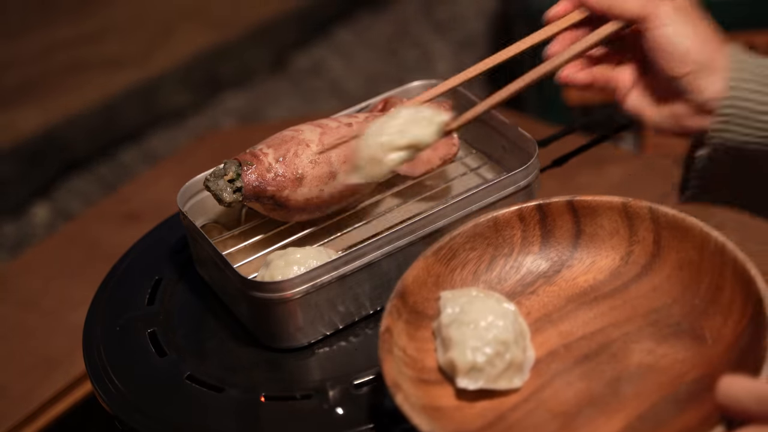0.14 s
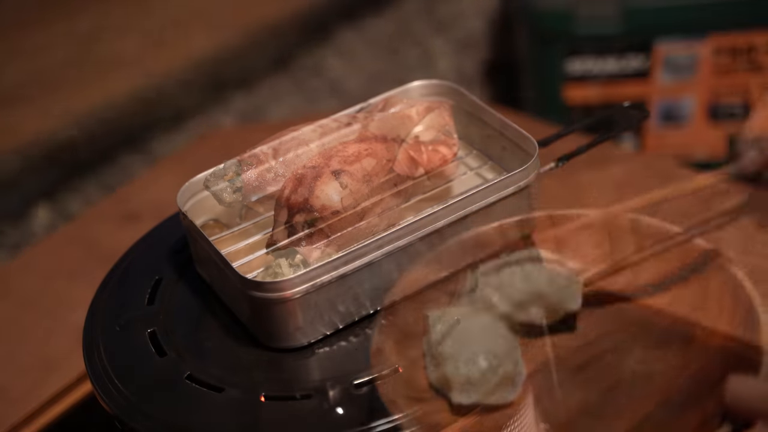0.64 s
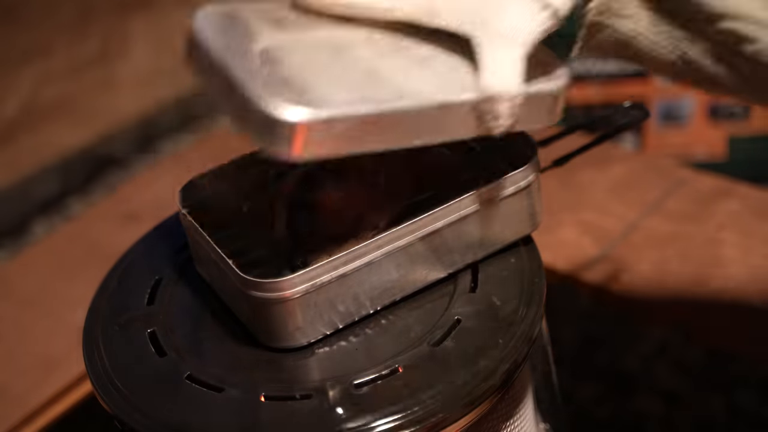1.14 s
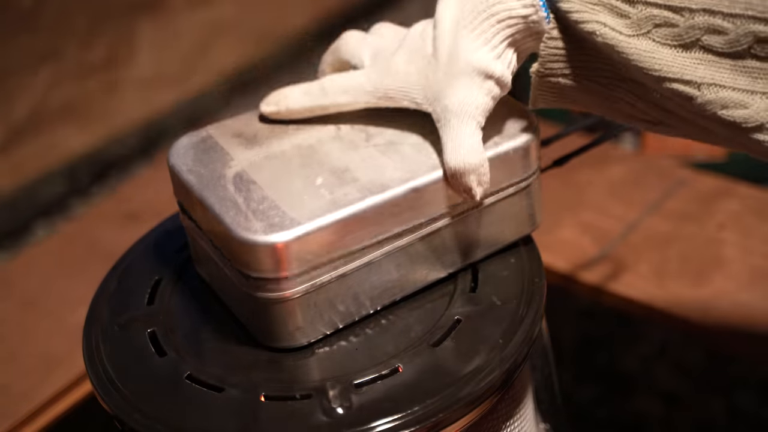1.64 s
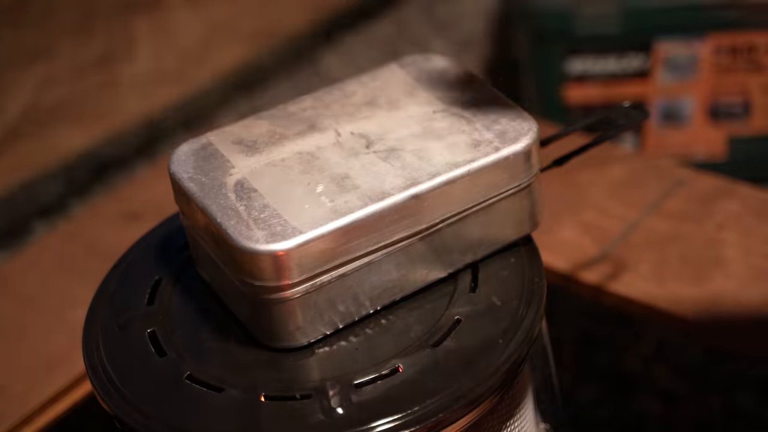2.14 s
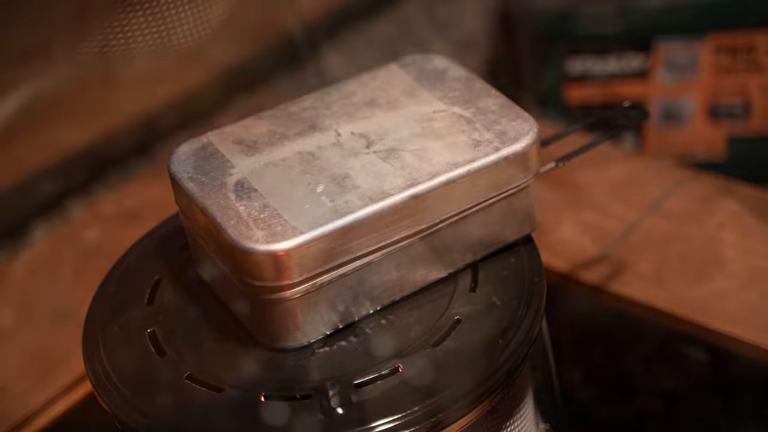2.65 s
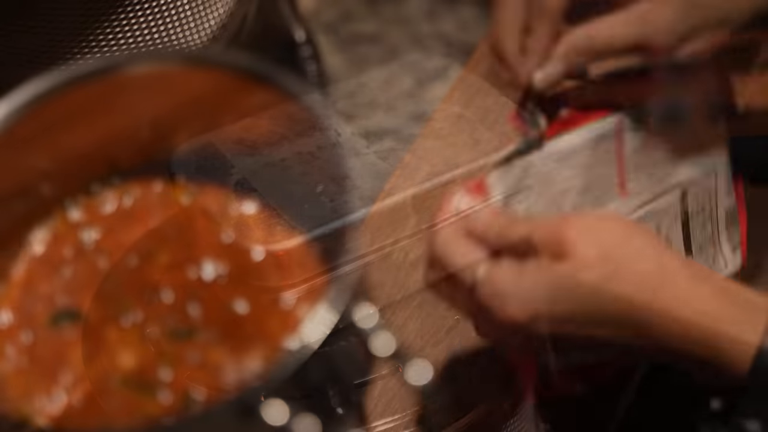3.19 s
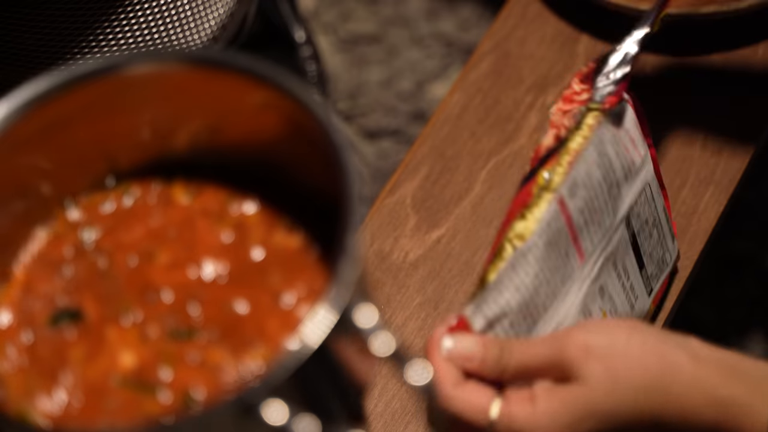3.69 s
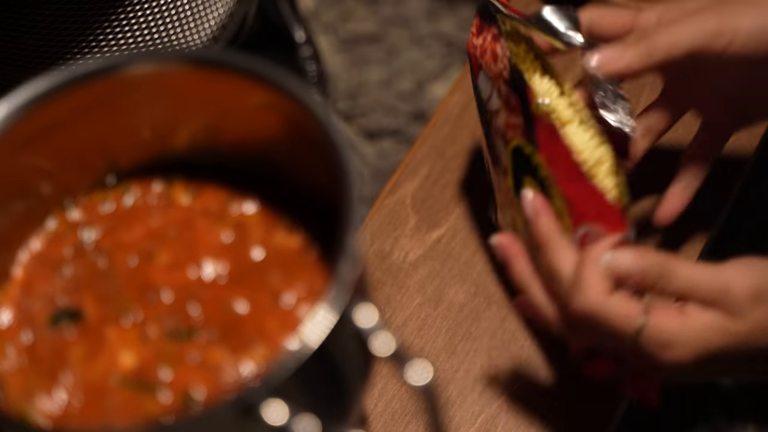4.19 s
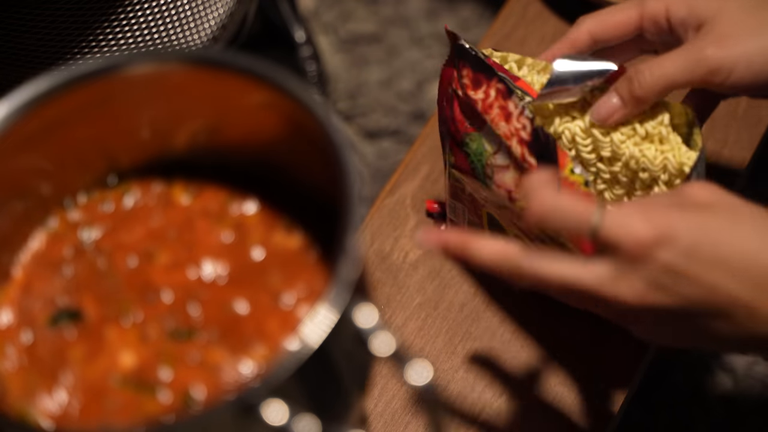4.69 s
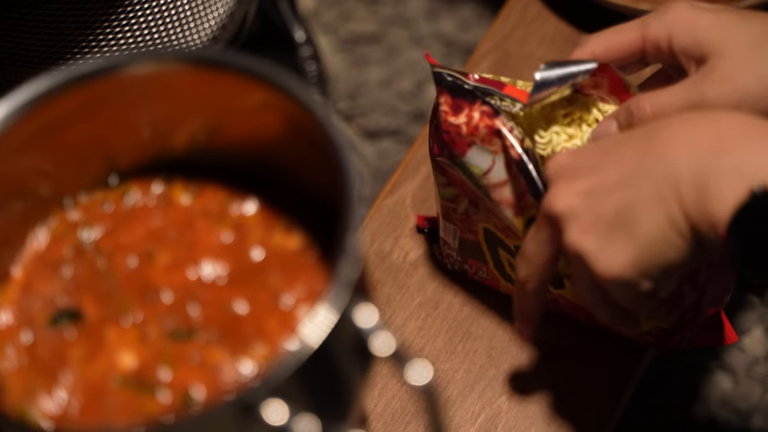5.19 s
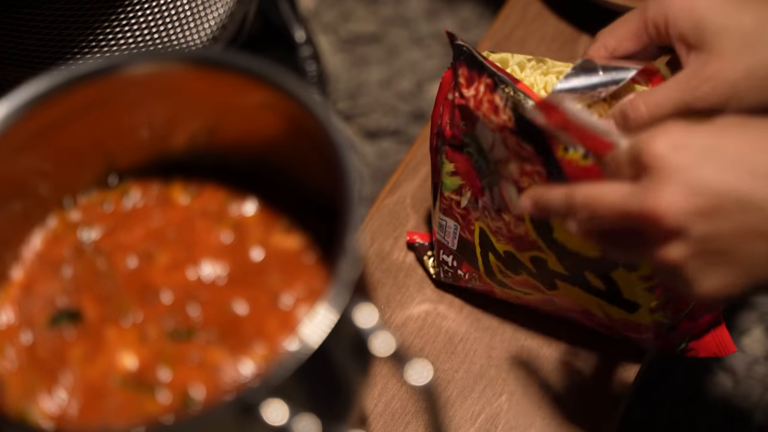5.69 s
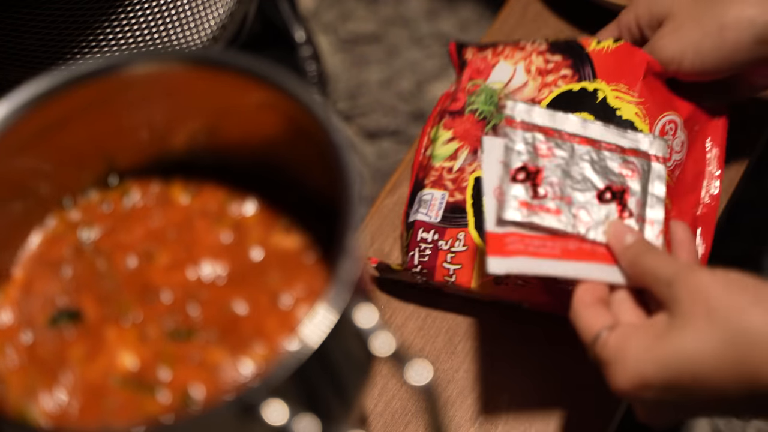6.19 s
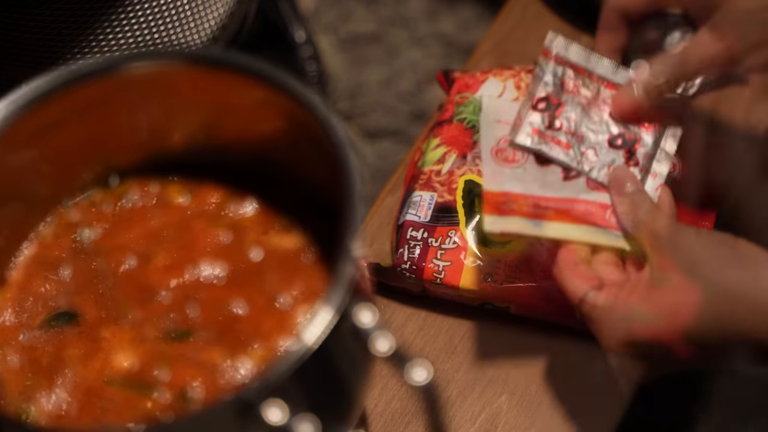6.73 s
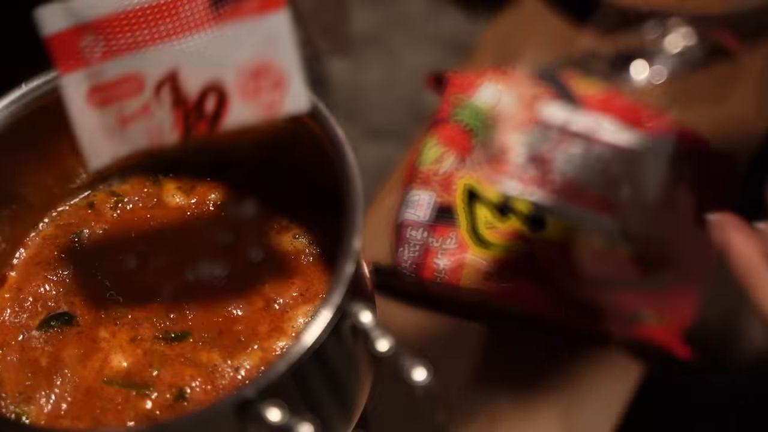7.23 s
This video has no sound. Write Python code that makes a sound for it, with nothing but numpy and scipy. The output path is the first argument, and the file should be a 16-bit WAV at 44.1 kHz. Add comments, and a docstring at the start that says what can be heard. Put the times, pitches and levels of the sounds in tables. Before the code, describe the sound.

A quiet camp kitchen at night, under a small shelter, picked up by one close microphone. Stove hiss, soft scraping and low rumble run beneath faint insect shimmer, high and steady; the hiss recedes once the packet takes over. At 0-0.5 s chopsticks give light clicks and dull knocks, with one more tick near 1.1 s. From 1.6 to 1.8 s a thin metal lid settles in several small clinks, ringing briefly with scraping rims. Tentative plastic crinkles begin around 2.1 s and thicken after 2.5. From 3 to 3.9 s the stiff film tears, in dense bright crackle with the loudest sharp snaps. Handling continues in bursts from 4 to 5 s, a hard crack lands at 5.3, and rustling follows. From 6 to 7.4 s there are sparser crisp crinkles, ticks and soft wooden bumps. Echoes are short and close.

```python
"""A camp kitchen at night under a small shelter. Throughout, a stove hisses, scrapes and rumbles (filtered noise) and
insects shimmer near 4 and 8 kHz (narrow noise). First chopsticks tap: snaps and dull knocks; at 1.6 s a tin lid is
set down, ringing in damped modes. From about 2.1 s a stiff plastic packet is torn and handled: its creases buckle in
dense tiny clicks and lone loud snaps, echoed by close walls. One microphone, both channels alike."""
import sys
import numpy as np
from scipy import signal
from scipy.fft import rfft, irfft, next_fast_len
from scipy.io import wavfile
from scipy.ndimage import uniform_filter1d

SR = 44100
rng = np.random.default_rng(int(sys.argv[2]) if len(sys.argv) > 2 else 0)


def attenuation_scalar(level_db):
    """Turn a level in dB into a linear amplitude multiplier (20 dB per decade)."""
    decades = np.asarray(level_db, float) / 20
    return 10 ** decades


def put_to_file(sound):
    """Save the sound as 16-bit audio at rate SR, in the file named by the first command-line argument."""
    columns = np.atleast_2d(sound).T  # one column per channel
    safe = np.clip(columns, -1, 1)
    whole_steps = np.round(safe * 32767)
    wavfile.write(sys.argv[1], SR, whole_steps.astype(np.int16))


N = 324135
T = np.arange(N) / SR
TAIL_SAMPLES = 8000


def level(x, db):
    """Scale to an rms level."""
    return x * attenuation_scalar(db) / np.sqrt(np.mean(x ** 2))


def curves(table):
    """Columns of a table at every sample."""
    s, *columns = np.transpose(table)
    return [np.interp(T, s, c) for c in columns]


def band(x, edges_hz, order=2):
    """Band-pass."""
    sos = signal.butter(order, np.clip(edges_hz, 20, 0.45 * SR), "band", fs=SR, output="sos")
    return signal.sosfilt(sos, x)


def colour(x, points):
    """Gain by frequency, joined on a log axis."""
    hz, gain_db = np.transpose(points)
    size = next_fast_len(N)
    bins_hz = np.arange(size // 2 + 1) * SR / size
    gain = attenuation_scalar(np.interp(np.log(bins_hz + 1), np.log(hz), gain_db))
    return irfft(rfft(x, size) * gain, size)[:N]


def walk(rate_hz):
    """Random levels held 1 / rate_hz and slewed twice; spread near 1."""
    k = int(SR / rate_hz)
    held = np.repeat(rng.standard_normal(N // k + 1), k)
    return 1.48 * uniform_filter1d(uniform_filter1d(held, k), k)[:N]


def shelter(x, t60_s, wet_db, gap_ms=2.05, rise_ms=0.96):
    """Close cloth walls: a short gap, separate echoes, then a wash that dies fast.
    The hands move about, so every 15 ms the sound takes an echo path drawn at random."""
    paths, path_samples = 48, 662
    t = T[:TAIL_SAMPLES]
    late_s = np.maximum(t - gap_ms / 1000, 0)
    sparse = attenuation_scalar(6.5 * np.exp(-t / 0.017) * rng.exponential(size=(paths, len(t))))
    envelope = (1 - np.exp(-late_s * 1000 / rise_ms)) * attenuation_scalar(-60 * late_s / t60_s)
    echo = sparse * rng.standard_normal((paths, len(t))) * envelope
    echo = echo * attenuation_scalar(wet_db) / np.sqrt(np.sum(echo ** 2, axis=1, keepdims=True))
    pieces = np.append(x, np.zeros(-N % path_samples)).reshape(-1, path_samples)
    size = next_fast_len(path_samples + len(t))
    chosen = rfft(echo, size)[rng.integers(0, paths, len(pieces))]
    wet = irfft(rfft(pieces, size) * chosen, size)
    out = np.append(x, np.zeros(2 * size))
    for k, piece in enumerate(wet):
        out[k * path_samples:k * path_samples + size] += piece
    return out[:N]


# stove and close handling, before flutter and fade: time_s, hiss_db, scrape_db
STOVE_LEVELS = [(0.0, -35.5, -49), (0.2, -43, -44), (0.37, -43, -42.5), (0.53, -46.5, -54),
                (0.81, -45, -53.5), (1.2, -44.5, -58.5), (1.5, -46.5, -61), (1.79, -41, -46),
                (1.93, -49.5, -60), (2.18, -47, -60), (2.25, -42, -53)]


def stove():
    """Fine noise hiss above, soft scraping below; both give way to the packet."""
    hiss_db, scrape_db = curves(STOVE_LEVELS)
    hiss = level(band(rng.standard_normal(N), (3000, 17000), order=1), 0)
    hiss = hiss * attenuation_scalar(hiss_db + 2.0 * walk(10.93))
    scrape = level(band(rng.standard_normal(N), (600, 3200)), 0)
    scrape = scrape * attenuation_scalar(scrape_db + 2.5 * walk(24.9))
    return (hiss + scrape) * np.clip((2.6 - T) / 0.35, 0.3, 1)


# low noise before flutter: time_s, rumble_db, rush_db
RUMBLE_LEVELS = [(0, -49, -44), (.16, -40.5, -43), (.3, -49, -43.5), (.47, -40.5, -42), (.7, -49, -47.5),
                 (1.29, -48, -48), (1.45, -51, -49), (2.4, -49, -49), (2.8, -49, -48), (3.05, -53, -51.5),
                 (3.3, -52, -41.5), (4, -52.5, -48.5), (5.1, -51, -48.5), (6.3, -52, -47.5),
                 (6.45, -46, -48.5), (6.7, -49, -44.5), (7.05, -50.5, -48), (7.35, -44, -46)]


def rumble():
    """Burner roar and far-off traffic: two fluttering bands of low noise."""
    low_db, rush_db = curves(RUMBLE_LEVELS)
    low = level(band(rng.standard_normal(N), (58, 200), order=3), 0) * attenuation_scalar(low_db + 0.98 * walk(7))
    rush = level(band(rng.standard_normal(N), (200, 800)), 0) * attenuation_scalar(rush_db + 2.07 * walk(14))
    return low + rush


# chorus bands, before shimmer: centre_hz, width_hz, level_db
INSECT_BANDS = [(3850, 470, -50.5), (4370, 330, -55), (7800, 620, -60)]


def insects():
    """A distant chorus blurs into narrow noise bands that shimmer."""
    out = np.zeros(N)
    for hz, width_hz, db in INSECT_BANDS:
        chorus = band(rng.standard_normal(N), (hz - width_hz / 2, hz + width_hz / 2))
        out += level(chorus, db) * attenuation_scalar(1.5 * walk(9.7))
    return out


def clicks(spread_db=4.5, most_db=19.5, scatter_db=3.0, bunch_db=0.5):
    """Random buckling: many faint clicks, few strong ones, in bunches; each fold size takes its own share."""
    clicks_per_s = 2500
    size_db = np.minimum(spread_db * rng.exponential(size=N), most_db) + bunch_db * walk(45)
    struck = rng.random(N) < clicks_per_s / SR
    train = struck * rng.choice([-1., 1.], N) * attenuation_scalar(size_db)
    return level(train * attenuation_scalar(scatter_db * rng.standard_normal(size=(3, N))), 0)


# lone snaps of film, chopstick and fingernail, before crack gain, flurry, colour and echo:
# crack_s, crack_db, swarm_db, large_fold_db, fine_crease_db (last two re middle folds)
SNAP_EVENTS = [(0.032, -18, -27, -0.5, -1), (0.1556, -25, -37, -1, -7), (0.1938, -22, -45, 0, 2),
               (0.4965, -18, -42.5, -3, 0.5), (1.0658, -17.5, -46, -14, 9), (2.1369, -34, -47, -3, 0),
               (2.2202, -21, -53, -14, -5), (2.2445, -24, -36, -16, 1), (2.2958, -26, -36.5, -8, 0),
               (2.3415, -21, -36.5, -16, 2.5), (2.4418, -19, -31.5, -7, 0), (2.5026, -11.5, -51, -14, 5),
               (2.575, -11.5, -48, -7, 0), (2.6845, -14, -41, -4, -2), (2.7384, -17, -32.5, -11, 0.5),
               (2.81, -12.5, -31.5, -9.5, 2), (2.852, -22, -33.5, -4.5, -1), (2.9676, -22, -39.5, -21, 5),
               (3.0022, -11.5, -32.5, -3.5, -3), (3.0385, -19, -36, -19, 2), (3.0533, -7, -31, -5.5, 0),
               (3.1057, -9, -31, -12, -2), (3.145, -12, -40, -3, -2), (3.1916, -7, -27, -12, 3),
               (3.2493, -1, -28.5, -16, 4), (3.3414, -15, -32, -6, 0), (3.379, -2.5, -29, -8.5, -3),
               (3.4321, -4, -25, -6.5, -0.5), (3.483, -4.5, -24, -10, 0), (3.5092, 1.5, -28, -6, -7),
               (3.6297, -13, -31.5, -3.5, 3), (3.6514, -6, -31, -10, 5), (3.6862, -14, -24, -7, 0.5),
               (3.7722, -7.5, -33, -11, -1), (3.7993, -0.5, -26, -9.5, 1.5), (3.8325, -10, -26.5, -10, 1),
               (3.862, -4, -27.5, -9.5, -1), (3.8726, -4, -26.5, -19, 4), (4.0205, -10, -37.5, -14, 4),
               (4.045, -18, -35.5, -22, 9), (4.0906, -6, -45, -17, 11), (4.107, -12, -40, -27, 13),
               (4.156, -8, -28, -9, 1.5), (4.224, -9.5, -50, -4.5, -6), (4.2666, -10.5, -36, -12, 2),
               (4.3363, -14, -40, -15, 4), (4.389, -11, -30.5, -22, 1), (4.4346, -9, -26.5, -8.5, 3.5),
               (4.6673, -15, -32, -9, 2), (4.7233, -2.5, -24, -8.5, -0.5), (4.829, -15, -36, -12, 2),
               (4.9172, -5, -32.5, -2, 5), (4.9619, -9, -31.5, -5.5, 2), (4.995, -9.5, -32.5, -4, 1),
               (5.0651, -17, -30, -4, -2), (5.2054, -18, -45.5, 5, -11), (5.3196, -34, -32, -1.5, -4),
               (5.3296, 1.5, -32, -19, 2.5), (5.4434, -12.5, -30, -3, -2.5), (5.4834, -11.5, -37.5, 4, -6),
               (5.5162, -20, -32, -6.5, -6), (5.6437, -13, -47, -24, 13), (5.6866, -20, -44, 1, 1),
               (5.8399, -11, -40, -9.5, 0.5), (5.9006, -21, -43, -18, 8.5), (5.962, -23, -38.5, -18, 5.5),
               (6.0769, -13.5, -47, -4, 2), (6.1244, -7, -51, -15, 12), (6.1299, -3, -41, -21, 12),
               (6.217, -6.5, -29, -5.5, 5), (6.3318, -7, -34.5, -12, -3.5), (6.3569, -8, -36, -7, 1),
               (6.4385, -24, -31.5, -3, -3), (6.5038, -12.5, -38, -0.5, 1), (6.53, -16, -40.5, -24, 10),
               (6.5735, -8, -37, -6, 4.5), (6.7354, -24, -53, -8, -8), (6.8067, -16, -37, -13.5, 1),
               (6.8746, -13, -54, -14, 8), (6.9012, -21, -40, 0.5, 5), (6.972, -17, -52, 1, 2.5),
               (6.998, -16, -36.5, 3.5, -2), (7.0504, -16, -44, 1, -6), (7.0798, -21, -40.5, 1, -2),
               (7.209, -16, -40, -8, 2), (7.2953, -19, -37, 0, 0), (7.3085, -12, -32, -16, 6)]


def snaps(crack_gain_db=3.5):
    """A crease lets go in one sharp crack and sets off a dying swarm of its neighbours."""
    crack_samples = 24
    swarm_t60_s, swarm_lead_s = 0.18, 0.0015  # the neighbours start to give just before the crack
    flurry_db, flurry_s = 4, 0.0028  # the first neighbours go all at once
    rattle = rng.standard_normal((len(SNAP_EVENTS), crack_samples)) * np.exp(-np.arange(crack_samples) / 3)
    rattle[:, 0] = 3
    rattle = rattle / np.sqrt(np.sum(rattle ** 2, axis=1, keepdims=True))
    t = T[:TAIL_SAMPLES]
    dying_db = flurry_db * np.exp(-t / flurry_s) - 60 * t / swarm_t60_s
    cracks, swarm_power = np.zeros((2, 3, N + SR))
    for (s, db, swarm_db, fold_db, crease_db), shape in zip(SNAP_EVENTS, rattle):
        i = int(s * SR)
        share = attenuation_scalar(np.array([fold_db, 0, crease_db]))[:, None]
        cracks[:, i:i + crack_samples] += attenuation_scalar(db + crack_gain_db) * share / share.max() * shape
        j = i - int(swarm_lead_s * SR)
        swarm_power[:, j:j + TAIL_SAMPLES] += (share * attenuation_scalar(swarm_db + dying_db)) ** 2
    return cracks[:, :N] + np.sqrt(swarm_power[:, :N]) * clicks(most_db=17.0, bunch_db=1.17)


def radiate(train, edges_hz):
    """Clicks keep their power but sound only in one band."""
    return band(train, edges_hz) * np.sqrt(SR / 2 / (edges_hz[1] - edges_hz[0]))


# tone of the film: freq_hz, gain_db
FILM_TONE = [(200, 0.5), (500, -6.5), (1000, -1), (2000, 1.5), (3000, 0.13), (5000, 1.24), (8000, 2.2),
             (12000, 1.3), (15500, -0.6)]


def film(sizes):
    """Three sizes of fold radiate their own band, each with its own echo among the walls."""
    fold = shelter(radiate(sizes[0], (318, 2260)), 0.13, 1.37)
    body = shelter(radiate(sizes[1], (2220, 7560)), 0.32, 1.0)
    crease = shelter(radiate(sizes[2], (6840, 16570)), 0.36, 1.17)
    return colour(fold + body + crease, FILM_TONE)


# dull bumps on the board, before band-pass and echo: start_s, level_db, pitch_hz
BOARD_KNOCKS = [(0.032, -21, 1300), (.155, -33, 1500), (0.465, -26.5, 284), (3.005, -34, 293),
                (3.1, -27, 571), (3.192, -23.5, 510), (3.246, -21, 696), (3.31, -23.5, 825),
                (3.427, -23.5, 307), (3.63, -23, 477), (3.699, -21.5, 680), (3.796, -23, 570),
                (4.447, -23, 236), (4.729, -31, 781), (5.12, -24, 205), (5.329, -17.5, 1890),
                (5.554, -27.5, 357), (6.355, -27, 560), (6.432, -19, 196), (6.996, -22.5, 636),
                (7.308, -23.5, 1000)]


def knocks(t60_s=0.071, note_db=-13, rustle_db=-5.5):
    """Packet, bowl and knuckles bump the wooden board: a faint damped note in a dull rustle."""
    out, t = np.zeros(N + SR), T[:TAIL_SAMPLES]
    for s, db, hz in BOARD_KNOCKS:
        rustle = level(band(rng.standard_normal(len(t)), (0.31 * hz, 2.55 * hz), order=1), rustle_db)
        note = attenuation_scalar(note_db) * np.sin(2 * np.pi * hz * t)
        i = int(s * SR)
        out[i:i + len(t)] += attenuation_scalar(db - 60 * t / t60_s) * (note + rustle)
    return band(out[:N], (130, 4000))


# lid meets tin: start_s, level_db, contact_ms (nominal), rim_place (0-1)
BLOWS = [(1.608, -26.5, .1, 0.27), (1.7, -32, 0.13, .29), (1.722, -30, 0.16, 0), (1.751, -28, 0.1, .43),
         (1.777, -36, 0.14, 0.5), (1.795, -45, 0.17, 0.62)]
# lid resonances, before place and contact: freq_hz, level_db, t60_s
MODES = [(397, -5.5, 0.13), (682, 0.5, 0.073), (1136, -9, .1), (1700, -3, 0.066), (1920, -1.5, 0.075),
         (2330, -10, 0.1), (2670, 3, 0.25), (3360, -20, 0.09), (4587, -15, .1), (5680, -7, .1)]


def lid():
    """Thin aluminium rings briefly; the place struck picks the modes, a longer contact mutes the high ones."""
    out, t = np.zeros(N + SR), T[:TAIL_SAMPLES]
    for s, db, contact_ms, place in BLOWS:
        push = np.hanning(int(contact_ms * SR / 1000) + 3)
        ring = np.zeros(len(t))
        for k, (hz, mode_db, t60_s) in enumerate(MODES):
            reach = np.sin(np.pi * (k + 1) * place)
            ring += reach * attenuation_scalar(mode_db - 60 * t / t60_s) * np.sin(2 * np.pi * hz * t)
        scrape = attenuation_scalar(5.0 - 60 * t / 0.18) * band(rng.standard_normal(len(t)), (300, 5000))
        rims = attenuation_scalar(-4.0 - 60 * t / 0.14) * band(rng.standard_normal(len(t)), (5000, 16500))  # bare edges rub
        struck = np.convolve(ring + scrape, push / push.sum())[:len(t)]
        i = int(s * SR)
        out[i:i + len(t)] += attenuation_scalar(db) * (struck + rims)
    return out[:N]


# hands squeeze, pull or turn the packet, before colour and echo:
# start_s, held_s, crackle_db, large_fold_db, fine_crease_db (last two re crackle_db)
PACKET_GRIPS = [(2.174, 0.181, -47.5, -17, -2), (2.482, 0.084, -38, -5.5, 1.0),
                (2.66, 0.058, -35.5, -9, 1.5), (2.837, 0.11, -47.5, -5, -2.0), (3.02, 0.2, -36, -7, 0.5),
                (3.185, 0.35, -33.0, -17, 5), (3.606, 0.12, -33, -12.5, 0.5),
                (4.052, 0.15, -38.0, -12.0, 4), (4.301, 0.15, -38, -6.5, -5),
                (4.376, 0.076, -31.5, -9, 0.5), (4.526, 0.21, -45.5, -2.0, -3),
                (4.637, 0.16, -41.5, -7.0, 3.0), (4.915, 0.29, -42.5, -3.5, 0.5),
                (5.462, 0.22, -34.5, -4, -1.5), (5.76, 0.31, -42.5, -4.5, -0.5),
                (6.157, 0.043, -39.5, 1, 0.5), (6.256, 0.079, -43.5, -5, -3), (6.334, 0.166, -40, -4, -0.5),
                (6.604, 0.042, -43.5, -12, 0.0), (6.715, 0.221, -43.0, -17, 5), (6.979, 0.058, -44, -5, 5)]


def crackle():
    """Each grip swells in, holds and dies away; between grips the film only whispers."""
    rise_s, fade_db_per_s, resting_db = 0.021, 164, -51.5
    power = attenuation_scalar(2 * resting_db) * (T > PACKET_GRIPS[0][0]) * np.ones((3, 1))
    for s, held_s, db, fold_db, crease_db in PACKET_GRIPS:
        rise = np.clip((T - s) / rise_s, 0, 1)
        shape = rise * attenuation_scalar(-fade_db_per_s * np.maximum(T - s - held_s, 0))
        power = power + (shape * attenuation_scalar(db + np.array([[fold_db], [0], [crease_db]]))) ** 2
    return clicks() * np.sqrt(power)


def scene():
    """Everything reaches one microphone."""
    hits = shelter(knocks() + lid(), 0.16, -0.37)
    packet = film(crackle() + snaps())
    mono = packet + hits + stove() + rumble() + insects()
    return np.array([mono, mono])


def low_pass(x):
    """Removes everything above the highest recorded frequency."""
    return signal.sosfilt(signal.butter(12, 16970, fs=SR, output="sos"), x)


def record(dry):
    """The microphone drops the deepest bass and rounds the loudest cracks; the top is cut steeply."""
    bass_cut_hz, top_hz, full_scale = 42, 15800, 0.85
    bass_cut = signal.butter(2, bass_cut_hz, "high", fs=SR, output="sos")
    heard = full_scale * np.tanh(signal.sosfilt(bass_cut, dry) / full_scale)
    steep = signal.ellip(12, 0.2, 60, top_hz, fs=SR, output="sos")
    mix = signal.sosfilt(steep, heard)
    return low_pass(mix)


dry = scene()
out = record(dry)
put_to_file(out)
```